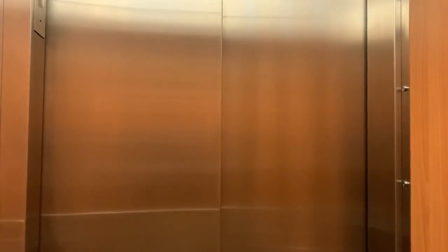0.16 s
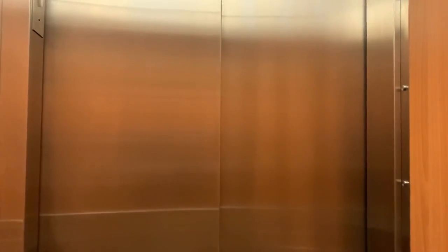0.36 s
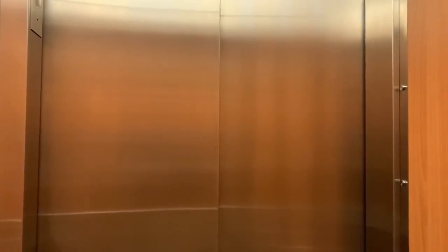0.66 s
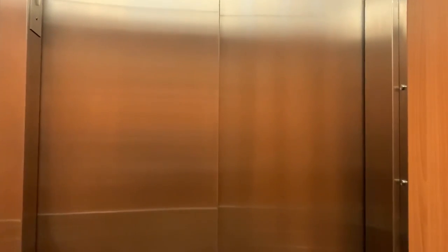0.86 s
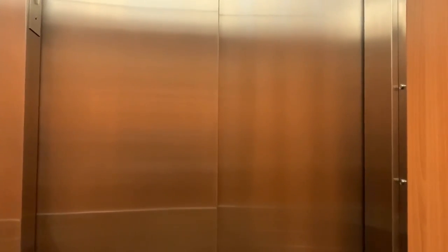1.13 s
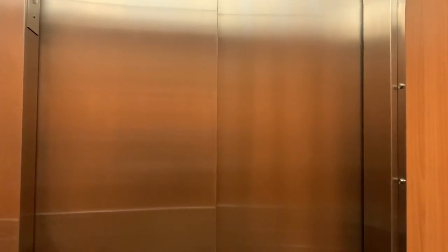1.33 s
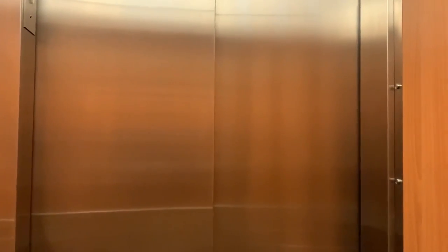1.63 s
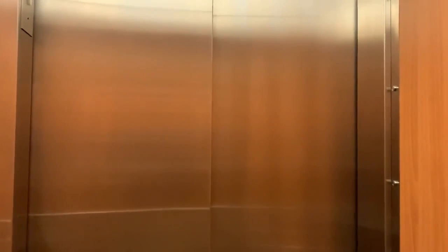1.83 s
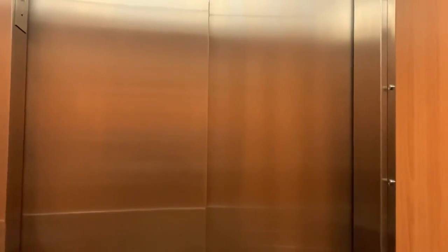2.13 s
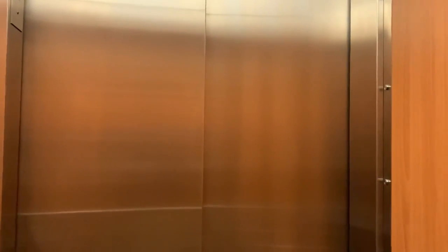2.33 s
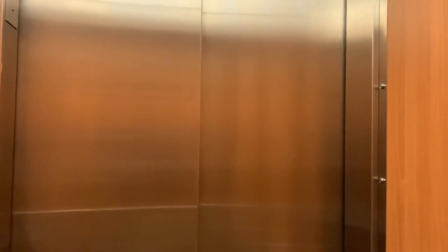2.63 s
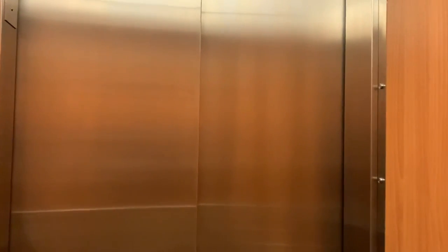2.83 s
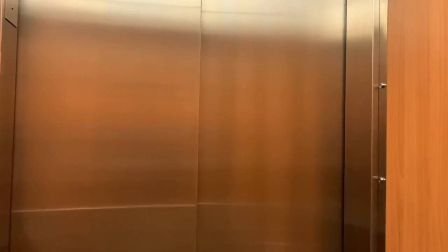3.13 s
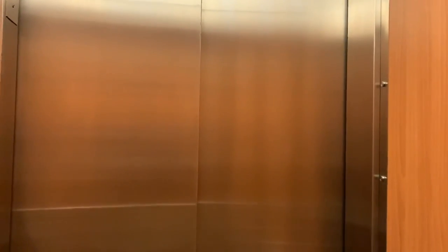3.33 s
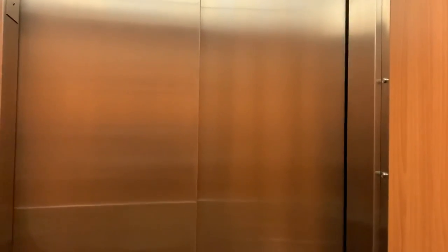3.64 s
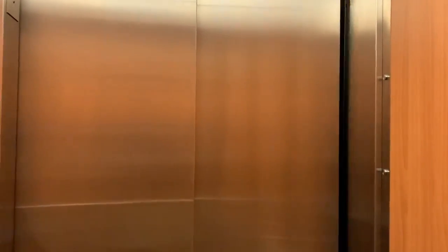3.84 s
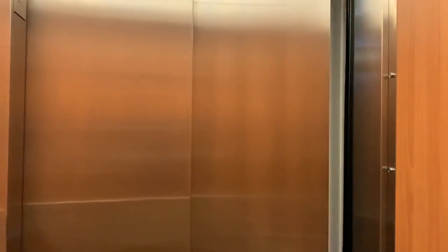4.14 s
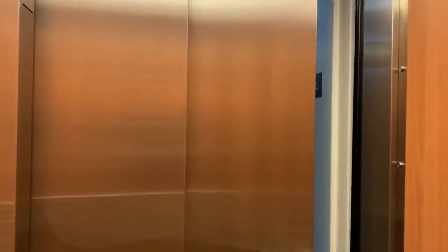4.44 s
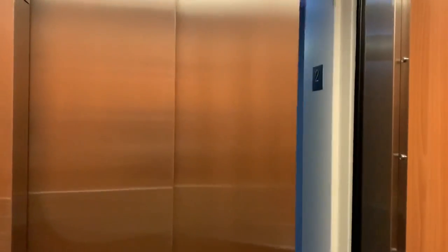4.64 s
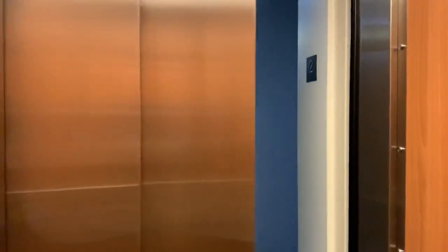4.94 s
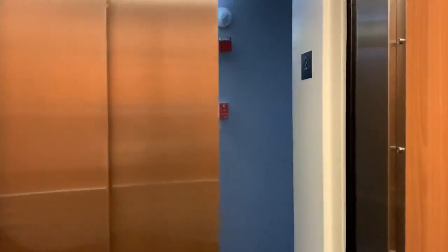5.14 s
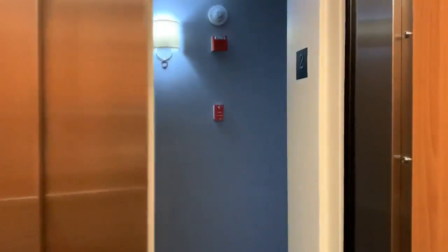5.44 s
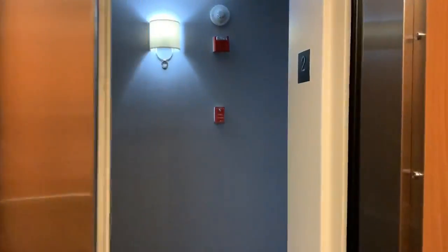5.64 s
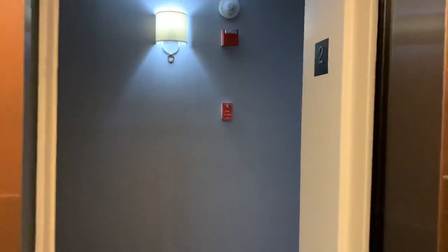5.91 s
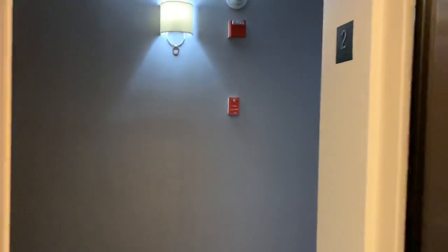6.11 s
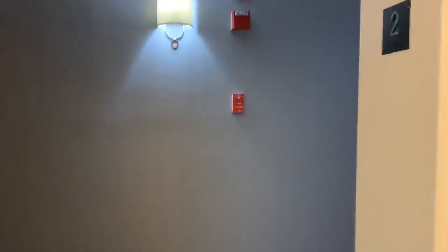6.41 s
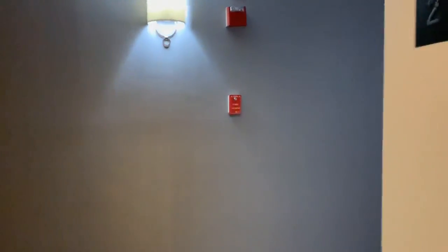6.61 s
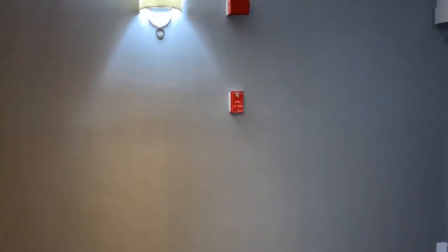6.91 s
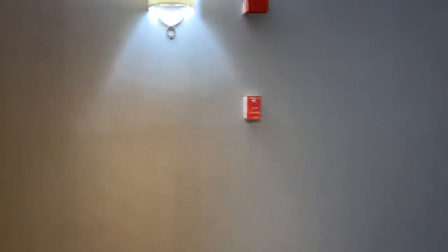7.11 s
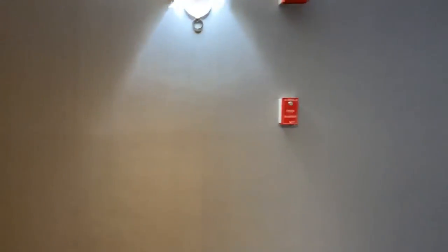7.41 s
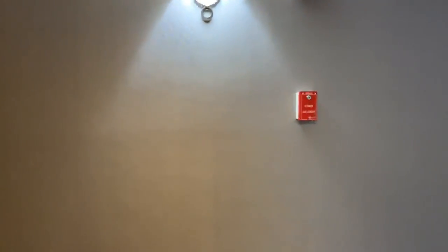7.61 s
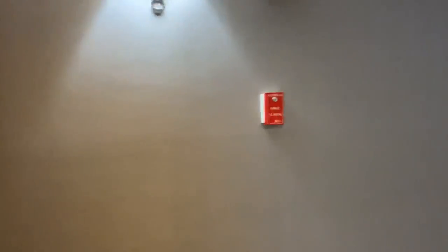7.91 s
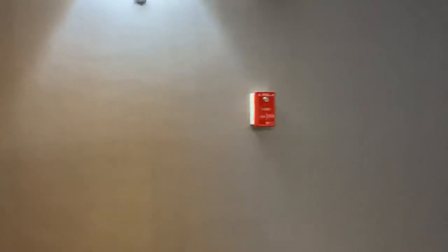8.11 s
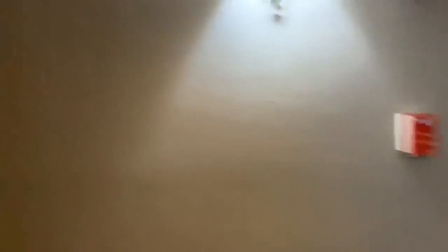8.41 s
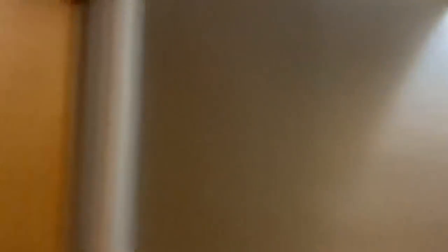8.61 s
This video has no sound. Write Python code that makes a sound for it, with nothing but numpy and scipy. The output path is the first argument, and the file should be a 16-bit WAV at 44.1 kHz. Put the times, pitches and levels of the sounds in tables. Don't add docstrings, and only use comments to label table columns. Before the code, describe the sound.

Inside a steel elevator car, a low fan motor hums with a slight throb over soft, boxy vent air. A faint deep roller tone dies as the car stops, with small ticks. Then a latch clunks and the doors roll open with tiny squeaks. The carried microphone crosses the sill with a few dull footfalls into a carpeted corridor, and hum and air fade behind.

```python
import sys
import numpy as np
from scipy import signal
from scipy.fft import rfft, irfft, next_fast_len
from scipy.io import wavfile
from scipy.ndimage import uniform_filter1d

SR = 44100
rng = np.random.default_rng(int(sys.argv[2]) if len(sys.argv) > 2 else 0)


def dump_mix(stems):
    frames = np.atleast_2d(stems).T
    limited = np.clip(frames, -1, 1)
    pcm = np.round(limited * 32767).astype(np.int16)
    wavfile.write(sys.argv[1], SR, pcm)


def ratio_of_db(decibels):
    return 10 ** (np.asarray(decibels, float) / 20)


N = 386307

STOP_S, TURN_S = 2.677, 7.85
TICK_LEAN_DB = -0.5


def in_time(rows):
    s, *columns = np.transpose(rows)
    return [np.interp(np.arange(N) / SR, s, column) for column in columns]


def at_hz(points, hz):
    points_hz, values = np.transpose(points)
    return np.interp(np.log(hz), np.log(points_hz), values)


def ramp(start_s, length_s):
    return np.clip((np.arange(N) / SR - start_s) / max(length_s, .01), 0, 1)


def dips(rows):
    gain = np.ones(N)
    for s, depth, half_s in rows:
        bump = np.exp(-((np.arange(N) / SR - s) / half_s) ** 2)
        gain = gain * (1 - np.clip(depth, 0, 1) * bump)
    return gain


def rms_one(x):
    return x / np.sqrt(np.mean(x ** 2) + 1e-20)


def resonance(x, hz, width_hz, rate=SR):
    r = np.exp(-np.pi * width_hz / rate)
    zeros = [(1 - r * r) / 2, 0, (r * r - 1) / 2]
    poles = [1, -2 * r * np.cos(2 * np.pi * hz / rate), r * r]
    return signal.lfilter(zeros, poles, x)


def sway(hz, width_hz):
    slow = rng.standard_normal(N // 40 + 4002)
    slow = resonance(slow, hz, width_hz, SR / 40)[4000:]
    return np.interp(np.arange(N) / 40, np.arange(len(slow)), rms_one(slow))


def pair(x, lean_db):
    return x * ratio_of_db(np.array([[.5], [-.5]]) * lean_db)


def stereo(mid, side, hz):
    # (frequency [Hz], correlation [-1 to 1])
    likeness = [(60, .95), (180, .93), (330, .85), (480, .3), (700, .2), (4000, .25), (8000, .55),
                (13000, .88)]
    # (frequency [Hz], left minus right [dB])
    lean = [(60, -3.0), (220, -2.5), (330, -1.3), (500, 0.3), (950, 0.3), (3770, -0.8), (15000, -0.8)]
    # (frequency [Hz], lag [samples])
    left_lag = [(60, 25), (250, 3), (500, -10), (750, -14), (1100, -7), (1600, 9), (4000, -17), (13000, 13)]
    alike = np.clip(at_hz(likeness, hz), -.99, .99)
    lag = round(at_hz(left_lag, hz))
    left, right = np.sqrt(1 + alike) * mid + np.sqrt(1 - alike) * side * [[1], [-1]]
    lagged = np.array([np.roll(left, max(lag, 0)), np.roll(right, max(-lag, 0))])
    return pair(lagged, at_hz(lean, hz))


def motor():
    # (time [s], hum [dB], overtone against hum [dB])
    fan = [(0.0, -22, -12), (0.7, -23.5, -16), (1.36, -22.5, -15), (1.63, -24, -17.5), (4.61, -22, -15),
           (4.68, -23, -22), (4.73, -24, -11), (5.39, -24.5, -12.5), (5.56, -24.5, -21), (5.73, -27, -10),
           (5.83, -24, -17), (7.27, -32.5, -15.5), (7.54, -34, -20.5), (7.64, -35, -10), (7.83, -33.5, -26),
           (8.2, -32, -14), (8.34, -32, -19.5), (8.76, -34, -12)]
    # (time [s], depth [0-1], half length [s])
    jolts = [
        (0.245, 0.22, .04),
        (1.69, 0.35, 0.047),
        (3.578, 0.6, 0.017),
        (3.67, .65, 0.025),
        (3.794, 0.36, 0.026),
        (6.307, 0, 0.029),
        (6.848, 0.6, .015),
        (6.93, 0.5, .015),
    ]
    # (time [s], depth [0-1], half length [s])
    dropouts = [(.14, 0.48, .04), (.29, .8, .03), (.62, 0.4, .05), (.83, .7, 0.038), (1.07, 0.73, 0.054),
                (1.71, .6, 0.084), (1.95, .4, .04), (2.25, .5, .05), (2.71, .7, 0.031), (2.85, .65, .035),
                (3.12, 0.73, .04), (3.4, .4, .05), (3.85, .6, 0.045), (4.17, .8, .03), (5.0, .3, .04),
                (5.86, 0.7, .05), (6.2, 0.3, 0.046)]
    rotor_hz, loaded_hz, standing_hz, settle_s = 8.24, 117.45, 118.23, 0.5
    third_db, third_outside_db = -62.5, -51

    hum_db, overtone_db = in_time(fan)
    pitch_hz = loaded_hz + (standing_hz - loaded_hz) * ramp(STOP_S - settle_s / 2, settle_s)
    pitch_hz = pitch_hz + 0.19 * sway(0.83, 1.1)
    phase = 2 * np.pi * np.cumsum(pitch_hz) / SR - .9
    lag = np.array([[-1], [1]]) * (.135 + .1 * ramp(6.9, .6))

    throb, twist = sway(rotor_hz, 2.4), sway(rotor_hz, 5.4)
    throbbing = 1 + (0.12 - 0.16 * ramp(TURN_S, .2)) * throb
    hum_gain = dips(jolts) * ratio_of_db(hum_db + 3.0 + 0.4 * sway(0.97, 4.5)) * throbbing
    hum = hum_gain * np.sin(phase + lag + 0.055 * twist)

    rough = 1.263 * dips(dropouts) * (1 + 0.21 * sway(rotor_hz, 4.4)) * (1 + 0.12 * sway(3.0, 3.9))
    overtone = np.sin(2 * phase + 1.1 * lag - 1.5 + 0.4 * sway(3.0, 8.0))
    overtone = ratio_of_db(hum_db + overtone_db + 4.0) * rough * overtone

    third_gain = ratio_of_db(third_db + (third_outside_db - third_db) * ramp(7.7, .6))
    third = third_gain * np.sin(3 * phase + 0.3 * sway(1.0, 2.0))
    return pair(hum, lean_db=-3.0) + pair(overtone, lean_db=-3.0) + pair(third, lean_db=-4.0)


def cabin_noise(share, t60):
    t = np.arange(SR // 5) / SR
    echoes = rng.standard_normal((2, 2, len(t))) * ratio_of_db(-60 * t / max(t60, .01))
    vent = rng.standard_normal((2, 1, N + len(t) - 1))
    vent = signal.fftconvolve(vent, echoes, "valid", axes=2)
    share = np.clip(share, 0, 1)
    return np.sqrt(share) * rms_one(vent) + np.sqrt(1 - share) * rng.standard_normal((2, 2, N))


def air():
    # (frequency [Hz], level [dB per Hz])
    air_colour = [(22, -13.5), (40, -13), (80, -3), (140, -5), (205, -10), (300, -5.5), (430, -18),
                  (650, -17), (900, -18.5), (1150, -17.5), (1900, -24.5), (2600, -30.5), (3500, -32.5),
                  (5300, -42), (7000, -44.5), (15000, -50)]
    # (frequency [Hz], width [Hz], level [dB], more while the car moves [dB], more with doors open [dB])
    panels = [(83.2, 5.8, -55.5, .1, 0.3), (170.8, 3.4, -55, .1, .1), (266.3, 20, -57.5, 2.1, .1),
              (294.2, 11, -57, -0.1, -2.5), (335.3, 7.4, -57.5, 1.3, -3.5), (350, 16, -57.5, -1.1, -3.1),
              (389.7, 8, -60, -0.7, 0.5), (414, 27, -68.5, -1, 9), (470, 14, -60.5, 3, -2.5),
              (575, 24, -65, 1.5, -0.2), (670, 8, -71, -0.5, -1), (714.6, 14, -66, 0.7, -1),
              (800, 28, -66, -0.5, 0.5), (1125, 29, -62, 0.7, 0.3), (1261, 23, -68, 2.1, .1),
              (2500, 130, -64.5, -0.5, 2.6), (2950, 47, -81.5, 0.5, .1), (3790, 150, -74, -1, .1),
              (4620, 77, -82, .1, .1), (5500, 130, -89, .1, .1)]
    # (time [s], change of air sound [dB])
    walk = [
        (0, 0.5),
        (.6, 0.5),
        (5.4, 0),
        (6.1, -1.5),
        (6.8, -2),
        (7.2, -5.5),
        (7.8, -7),
        (8.76, -6),
    ]
    # (frequency [Hz], share of the loss)
    walk_share = [(40, .45), (200, 0.88), (400, 1.25), (900, 0.98), (2500, 1.13), (6000, .05), (13000, .3)]
    # (frequency [Hz], rise [dB])
    doors_lift = [(40, 7.5), (75, 2), (380, 1.5), (600, -2.5), (1100, 0), (2500, 0), (6000, 4.5),
                  (13000, 6.5)]
    # (frequency [Hz], rise [dB])
    shaft_lift = [(25, 2.5), (45, 5.5), (80, 5), (140, 1.5), (300, 1), (1000, -0.5)]
    # (frequency [Hz], loss [dB])
    turn_loss = [(400, 1.8), (2500, 3), (6000, 3), (13000, 2.5)]
    doors_start_s, doors_rise_s, doors_end_s, doors_fall_s = 3.55, 0.33, 6.85, 0.13

    turned = ramp(TURN_S, 0.097)
    walk_db = in_time(walk)[0]
    moving = 1 - ramp(STOP_S - .8, 0.29)
    doors_open = ramp(5.0, .6)
    rolling = ramp(doors_start_s, doors_rise_s) - ramp(doors_end_s, doors_fall_s)
    rolling = rolling * (1 + 0.1134 * (np.arange(N) / SR - doors_start_s))

    def follow(hz):
        gained = at_hz(doors_lift, hz) * rolling + at_hz(shaft_lift, hz) * moving
        return 1.5 + at_hz(walk_share, hz) * walk_db + gained - at_hz(turn_loss, hz) * turned

    white = cabin_noise(share=0.86, t60=0.23)
    gust = sway(2.3, 2.7)
    band_edges = 20 * 2 ** np.arange(0, 10, .5)
    out = 0
    for k, (low, high) in enumerate(zip(band_edges, band_edges[1:])):
        hz = np.sqrt(low * high)
        sos = signal.butter(2, [low, high], "band", fs=SR, output="sos")
        band = signal.sosfilt(sos, white[k % 2])
        flicker_db = (0.21 + 1.0 * hz / 10000) * gust + 1.9 * sway(2.24, 6.5)
        level_db = at_hz(air_colour, hz) - 22.0 + follow(hz) + flicker_db
        out = out + ratio_of_db(level_db) * stereo(*band, hz)
    for k, (hz, width_hz, db, moving_db, open_db) in enumerate(panels):
        shaken = rms_one(resonance(white[k % 2, :, ::-1], hz, width_hz))
        level_db = db + follow(hz) + moving_db * moving + open_db * doors_open
        out = out + ratio_of_db(level_db) * stereo(*shaken, hz)
    return out


def blows(events, modes, thud_db, tail_s):
    out, t = np.zeros((2, N)), np.arange(SR // 3) / SR
    for s, db, centre_hz, rattle_s in events:
        builds_up = centre_hz > 1800 or rattle_s > .037
        swell = np.minimum(t / .015, 1) if builds_up else 1

        push = rng.standard_normal((2, len(t))) * ratio_of_db(-20 * t / max(rattle_s, .002))
        push[0, 0] += 12.0
        soft = signal.butter(2, min(3.9 * centre_hz, 16000), fs=SR, output="sos")
        push = signal.sosfilt(soft, push * swell)

        tail = rng.standard_normal((2, len(t))) * swell * ratio_of_db(-60 * t / tail_s)
        for relative_width in (0.38, 1.75, 3.7):
            tail = resonance(tail, centre_hz, relative_width * centre_hz)
        hit = ratio_of_db(thud_db) * stereo(*rms_one(tail), centre_hz)

        for hz, mode_db, t60 in modes:
            off_db = 10.8 * abs(np.log2(hz / centre_hz))
            ring = rms_one(resonance(push, hz, 1.13 / t60))
            hit += ratio_of_db(mode_db - off_db) * stereo(*ring, hz)
        at = round(s * SR)
        out[:, at:at + len(t)] += ratio_of_db(db) * (hit / np.abs(hit).max())[:, :N - at]
    return out


def door():
    # (time [s], peak [dB], centre [Hz], rattle [s])
    knocks = [(3.515, -29, 250, 0.045), (3.522, -34, 1000, .042), (3.548, -21, 227, 0.019),
              (3.578, -27, 265, 0.04), (3.622, -16, 1010, 0.016), (3.616, -17, 165, 0.012),
              (3.637, -21, 1050, 0.025), (3.645, -17.5, 500, 0.033), (3.62, -32, 4000, .05),
              (3.628, -28, 2300, 0.037), (3.675, -27.5, 1030, 0.05), (3.67, -20, 342, 0.056),
              (3.72, -17, 115, 0.044), (3.56, -21.5, 77, 0.09), (3.95, -23, 76, .06),
              (3.73, -35, 1100, 0.05)]
    # (frequency [Hz], level [dB], t60 [s])
    door_modes = [(74.7, 0.5, 0.48), (52, -2, .25), (225.7, 1, .2), (225, -21, 0.49), (299, 6, 0.25),
                  (339.6, 6.5, 0.23), (584, -2, 0.15), (960, 0.5, 0.05), (1035, 8, 0.13),
                  (1196, -1.5, 0.09), (2253, -1.5, 0.07), (2440, -2, .08), (3640, -6, 0.1),
                  (4240, -5.5, .08)]
    return blows(knocks, door_modes, thud_db=4.5, tail_s=0.33)


def footfalls():
    # (time [s], peak [dB], centre [Hz], rattle [s])
    steps = [(6.38, -36, 249, 0.017), (6.711, -28, 290, 0.0066), (6.765, -24.5, 91, 0.032),
             (6.879, -25.5, 580, 0.01), (6.873, -38, 2600, 0.018), (6.882, -22, 261, 0.012),
             (6.895, -31, 480, 0.033), (6.9, -30, 330, 0.06), (7.23, -28, 200, 0.085),
             (7.3, -30.5, 179.6, 0.051), (7.78, -33.5, 148, 0.035), (7.9, -38, 50.6, 0.04),
             (4.75, -23.5, 177, .05), (1.83, -32, 55, .05), (7.22, -39, 500, 0.033), (7.35, -44, 850, .05),
             (7.59, -38, 400, .03), (7.6, -45, 800, 0.022), (7.765, -40, 850, .03), (6.15, -41, 40, .1)]
    # (frequency [Hz], level [dB], t60 [s])
    sill_modes = [(98.2, 16.5, 0.35), (181.8, 10, 0.24), (212, -1, 0.99), (300, -8.5, 0.22),
                  (381, -2.5, 0.16), (500, -2, 0.2), (640, -1.5, 0.05), (905, -19, .1), (1140, -16, .1),
                  (2500, -11, .1)]
    return blows(steps, sill_modes, thud_db=0.5, tail_s=0.23)


def ticks():
    # (time [s], peak [dB], centre [Hz], t60 [s])
    tick_events = [(2.449, -39, 5270, 0.04), (2.47, -47, 9500, 0.14), (2.619, -38, 5200, .045),
                   (2.667, -35, 2560, 0.36), (2.676, -45, 10100, 0.23), (2.803, -52.5, 7500, 0.027),
                   (2.803, -37.5, 2630, .05), (2.908, -42.5, 8000, 0.2), (3.584, -44, 9050, 0.59),
                   (3.616, -32.5, 6900, 0.22), (3.789, -35.5, 7000, 0.3), (4.4, -45, 7000, 0.19),
                   (5.36, -41, 13400, .08), (5.46, -39.5, 7000, 0.33), (5.63, -45, 9000, 0.51),
                   (6.163, -38.5, 5100, 0.21), (6.265, -41.5, 3600, 0.26), (6.49, -42, 6000, .34),
                   (6.805, -38, 13200, 0.22), (6.823, -39, 8500, 0.14), (6.879, -42, 9000, 0.13),
                   (7.469, -48, 9030, 0.13), (7.534, -49, 7500, 0.2), (7.621, -46.5, 8200, 0.23),
                   (7.757, -40.5, 7000, .05), (7.764, -45, 13070, 0.24), (7.83, -46.5, 10530, .1),
                   (8.057, -43, 6970, .05), (8.064, -43, 12900, 0.2), (8.344, -47.5, 11100, 0.24),
                   (2.455, -49.5, 13100, 0.16), (2.814, -46.5, 3100, .02), (2.921, -38.5, 2800, .06),
                   (4.969, -46.5, 4000, .1), (6.598, -40.5, 4500, .08), (6.641, -40.5, 4300, .1),
                   (7.287, -48, 4500, .08), (7.732, -52, 4000, .05), (7.618, -44, 8370, .03),
                   (8.623, -53, 3800, .08)]
    out, t = np.zeros((2, N)), np.arange(SR // 4) / SR
    for s, db, hz, t60 in tick_events:
        width_hz = max(min(0.76 * hz, 2 * (14450 - hz)), 100)
        centre_hz = np.clip(hz, 1000, 15000)
        click = ratio_of_db(-60 * t / 0.0092)
        tail = .5 * np.minimum(t / 0.007, 1) * ratio_of_db(-60 * t / max(t60, .01))
        burst = rng.standard_normal((2, len(t))) * (click + tail)
        burst = resonance(burst, centre_hz, width_hz)
        burst = stereo(*resonance(burst, centre_hz, 2 * width_hz), hz)
        at = round(s * SR)
        out[:, at:at + len(t)] += pair(ratio_of_db(db) * burst / np.abs(burst).max(), TICK_LEAN_DB)[:, :N - at]
    return out


def snaps():
    # (time [s], peak [dB], centre [Hz], ring [s])
    snap_events = [(2.452, -45.5, 5100, .02), (2.472, -56, 8800, .008), (2.622, -45.5, 5300, .02),
                   (2.667, -41.5, 2200, .01), (2.805, -52, 7500, .006), (2.805, -45, 3000, .008),
                   (2.815, -47, 3200, .008), (2.909, -50, 7000, .004), (2.921, -48, 5500, .006),
                   (3.79, -46, 8000, .005), (5.37, -47, 4050, .05), (6.879, -40, 2200, .004),
                   (6.88, -48, 4500, .004), (7.469, -56, 9000, .006), (7.621, -50, 8300, .012),
                   (7.7635, -40, 12940, .006), (7.7635, -51, 10300, .008), (7.826, -52, 10500, .006),
                   (8.0648, -41, 13000, .006), (8.0648, -52, 10300, .01), (8.35, -56, 10300, .008)]
    out, click = np.zeros(N), np.eye(1, SR // 10)[0]
    for s, db, hz, ring_s in snap_events:
        narrow = rms_one(resonance(click, hz, 2.2 / max(ring_s, .002)))
        broad = rms_one(resonance(click, hz, 0.28 * hz))
        snap = narrow + 0.54 * broad
        at = round(s * SR)
        out[at:at + len(click)] += ratio_of_db(db) * snap / np.abs(snap).max()
    return pair(out, TICK_LEAN_DB)


def squeaks():
    # (time [s], length [s], frequency [Hz], level [dB])
    squeak_events = [(4.54, .05, 15500, -74), (5.36, .04, 4050, -58), (5.51, .1, 15500, -68),
                     (5.55, .05, 9200, -68), (5.73, .05, 15400, -72), (5.73, .1, 2500, -60),
                     (5.93, .09, 2500, -62), (6.405, .03, 8100, -61), (6.77, .02, 3900, -62),
                     (6.86, .03, 15500, -70), (7.02, .21, 15500, -69), (7.04, .16, 9200, -69),
                     (.32, .05, 15550, -80), (2.77, .04, 15600, -80), (3.56, .04, 15550, -78),
                     (4.09, .04, 15600, -80), (4.19, .04, 15650, -80), (5.09, .04, 15600, -79),
                     (5.63, .05, 15500, -74), (6.14, .04, 15550, -77), (6.63, .05, 15550, -79),
                     (7.24, .04, 15600, -80), (7.38, .07, 15600, -79), (7.75, .03, 15500, -78),
                     (8.055, .05, 15500, -73), (8.1, .05, 15550, -80), (8.34, .03, 15400, -80),
                     (3.555, .025, 2800, -59), (3.575, .045, 4200, -66)]
    out = np.zeros((2, N))
    for s, length_s, hz, db in squeak_events:
        count, at = round(length_s * SR), round(s * SR)
        rub = rng.standard_normal((2, SR // 4))
        for _ in range(3):
            rub = resonance(rub, hz, 250)
        rub = rms_one(rub)[:, -count:]
        out[:, at:at + count] += ratio_of_db(db + 7.5) * np.hanning(count) * rub
    return out


def travel():
    # (time [s], level [dB])
    roller_level = [(0.0, -48), (0.09, -41), (0.79, -50), (0.96, -40), (1.36, -38.5), (1.7, -44),
                    (1.97, -45), (2.54, -63), (2.6, -59)]
    t = np.arange(N) / SR
    pitch_hz = 35.9 - 0.82 * t
    level_db = in_time(roller_level)[0] - 30 * np.clip(t - 2.6, 0, 9)
    tone = np.sin(2 * np.pi * np.cumsum(pitch_hz) / SR)
    return pair(ratio_of_db(level_db + 4.0) * tone, lean_db=-3.0)


def fringes(x):
    # (low edge [Hz], high edge [Hz], share of frames heard)
    fringe_bands = [(11050, 11250, .5), (11250, 11500, .2), (13800, 14100, .85), (14100, 14450, .5)]
    fft_size = next_fast_len(N)
    bins, hz = rfft(x, fft_size), np.arange(fft_size // 2 + 1) * SR / fft_size
    silent_gap = (hz > 11050) & (hz < 12350)
    silent_top = (hz > fringe_bands[2][0]) & (hz < 15250)
    out = irfft(bins * ~(silent_gap | silent_top), fft_size)[:, :N]
    frame = np.arange(N) // 1024
    for low, high, share in fringe_bands:
        band = irfft(bins * ((hz > low) & (hz < high)), fft_size)[:, :N]
        loudness = np.log(np.bincount(frame, band[0] ** 2) + 1e-12)
        chance = uniform_filter1d(rng.standard_normal(len(loudness)), 2)
        loudness = loudness - .8 * uniform_filter1d(loudness, 40) + chance
        heard = loudness > np.quantile(loudness, 1 - share)
        out += uniform_filter1d(heard[frame] * 1., size=700) * band
    return out


def scene():
    around = air() + door() + footfalls() + ticks() + snaps()
    around = signal.sosfilt(signal.cheby2(18, 75, 15200, fs=SR, output="sos"), around)
    return motor() + around + squeaks() + travel()


def band_limit(x):
    return signal.sosfilt(signal.butter(12, 15790, fs=SR, output="sos"), x)


def record(dry):
    x = signal.sosfilt(signal.butter(2, 24, "high", fs=SR, output="sos"), dry)
    x = x - 0.25 * resonance(x, 5460, width_hz=800)
    x = fringes(x)
    return band_limit(x)


dry = scene()
out = record(dry)
dump_mix(out)
```